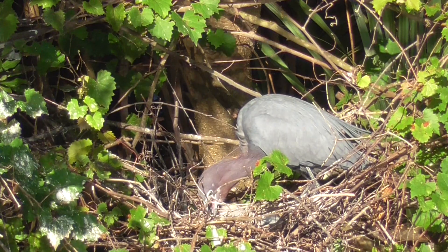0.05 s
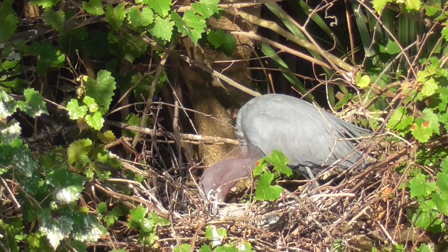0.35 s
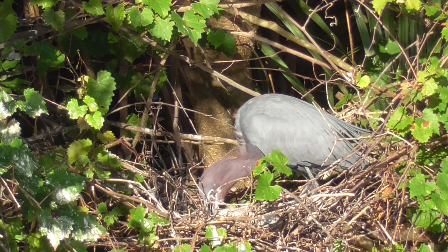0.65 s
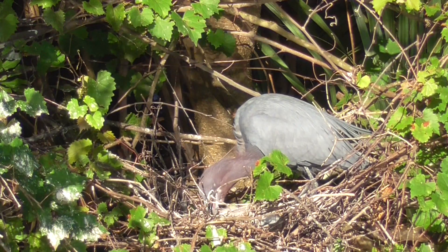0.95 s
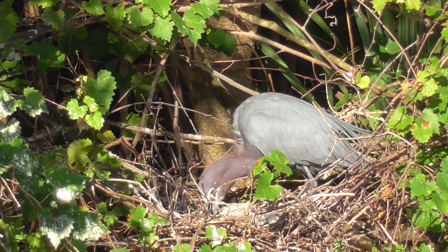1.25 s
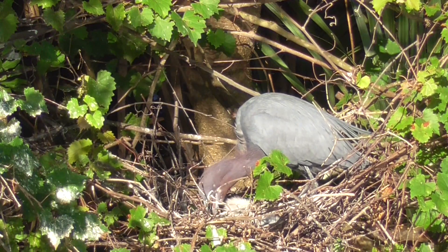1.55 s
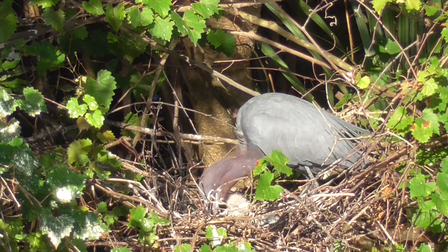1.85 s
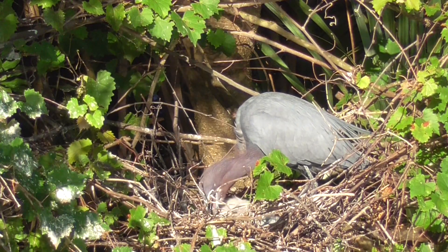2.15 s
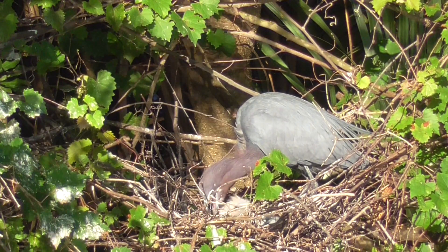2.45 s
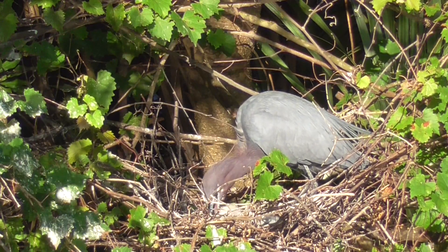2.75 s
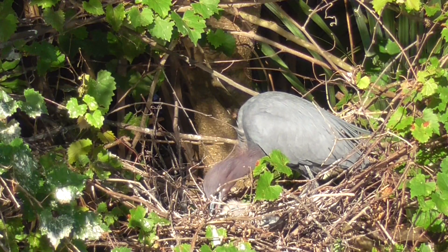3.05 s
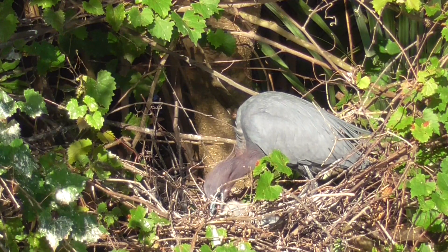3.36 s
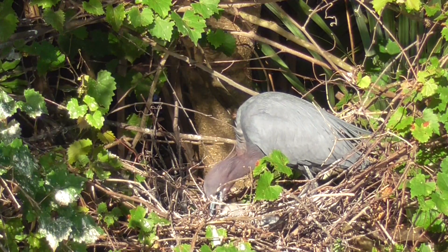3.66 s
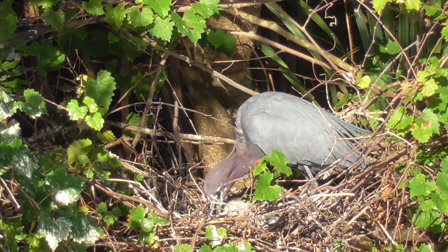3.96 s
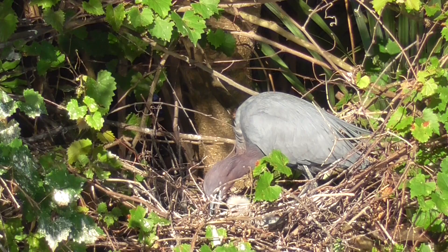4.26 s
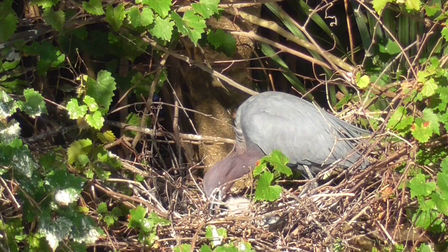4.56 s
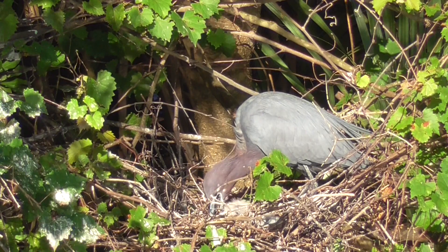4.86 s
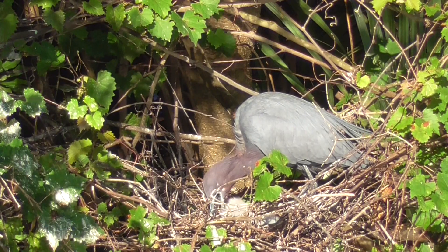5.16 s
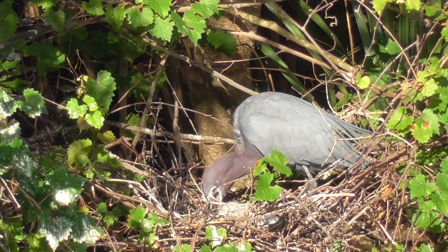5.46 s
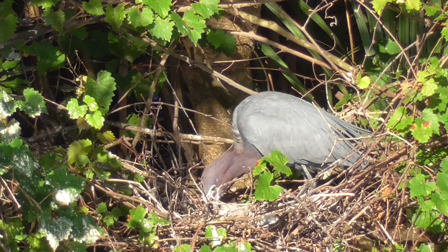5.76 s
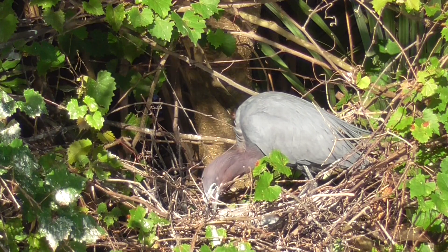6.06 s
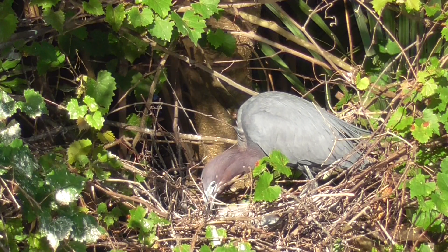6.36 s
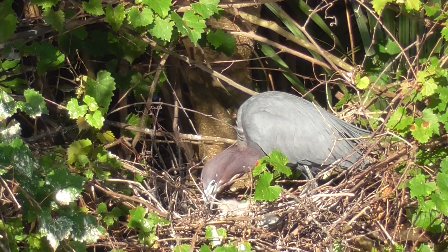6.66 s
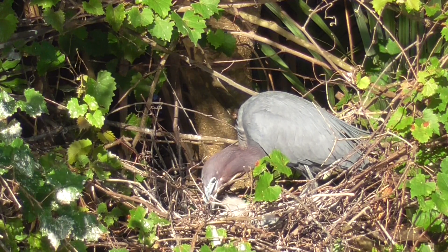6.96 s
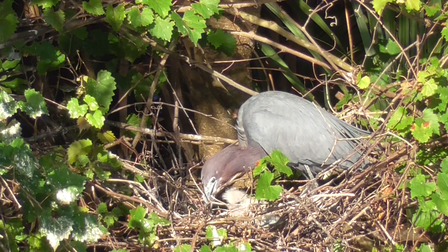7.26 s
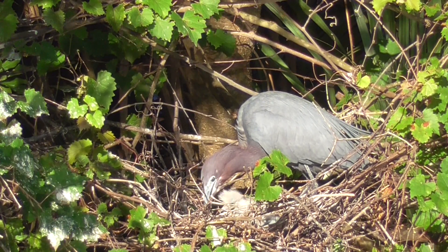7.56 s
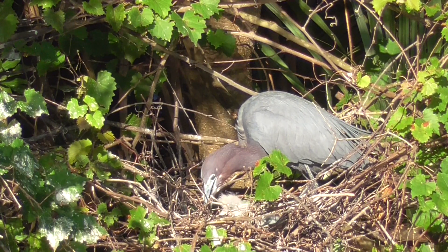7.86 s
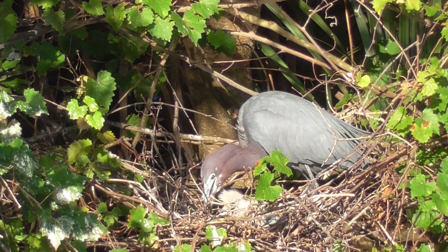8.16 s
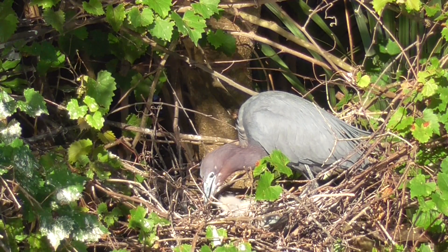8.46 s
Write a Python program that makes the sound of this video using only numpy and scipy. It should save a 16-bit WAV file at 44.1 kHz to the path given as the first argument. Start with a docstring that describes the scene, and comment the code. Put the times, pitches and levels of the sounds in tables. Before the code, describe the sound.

Heron nestlings beg with rapid, hoarse, high rasps and thin squeals over a faint distant traffic rumble.

```python
"""Heron nestlings beg with hoarse rasps, about five a second: fluttering air rings the throat over
a shaky whistle, and the open bill adds hiss. Thinner squeals, low clucks and a few gliding peeps come
in between, and the sticks of the nest knock as the birds shift. Leaves scatter these sounds. Farther
nests chatter, a faint insect starts near the end, and distant traffic and machines rumble underneath."""
import sys
import numpy as np
from scipy import signal
from scipy.fft import rfft, irfft, next_fast_len
from scipy.io import wavfile
from scipy.ndimage import map_coordinates

SR = 44100
rng = np.random.default_rng(int(sys.argv[2]) if len(sys.argv) > 2 else 0)


def unload_audio(sound):
    """Save the sound as a 16-bit wav file, at the path given as the first command line argument."""
    columns = np.transpose(np.atleast_2d(sound))
    # keep every value between -1 and 1, then stretch to whole-number steps
    steps = np.round(np.clip(columns, -1, 1) * 32767)
    wavfile.write(sys.argv[1], SR, steps.astype(np.int16))


N = 375732

# how alike traffic sounds in the two ears: f/Hz, likeness (1 = the same)
TRAFFIC_LIKENESS = [(60, 0.88), (130, 1), (290, 0.52), (640, 0.093), (1400, 0.096)]


def amp(db):
    """Turn decibels into a number to multiply by."""
    return 10 ** (np.asarray(db) / 20)


def unit(x):
    """Scale a sound to an average strength (rms) of 1."""
    return x / np.sqrt(np.mean(x ** 2) + 1e-20)


def along(points, hz):
    """Read between the rows of a (frequency, value) table, on a log frequency scale."""
    freqs, values = np.transpose(points)
    return np.interp(np.log(hz + 1), np.log(freqs + 1), values)


def clock(length):
    """The time of each sample over length seconds."""
    return np.arange(int(length * SR)) / SR


def wobble(rate, size):
    """A smooth curve through rate random values a second."""
    values = rng.standard_normal(int(size * rate / SR) + 4)
    return map_coordinates(values, [np.arange(size) * rate / SR])


def filtered(x, response):
    """Multiply each frequency in x by response(hz)."""
    size = x.shape[-1]
    padded = next_fast_len(size + 4096)
    hz = np.fft.rfftfreq(padded, 1 / SR)
    return irfft(rfft(x, padded) * response(hz), padded)[..., :size]


def coloured(x, spectrum):
    """Shape the tone of x by a (frequency, level) table, at strength 1."""
    return unit(filtered(x, lambda hz: amp(along(spectrum, hz))))


def resonance(x, centre_hz, width_hz):
    """Let x ring around one pitch: the same band filter twice, at strength 1."""
    band = lambda hz: 1j * hz * width_hz / (centre_hz ** 2 - hz * hz + 1j * hz * width_hz)
    return unit(filtered(x, lambda hz: band(hz) ** 2))


def spread(mid, side, likeness):
    """Mix two unrelated sounds into left and right; more side makes the ears less alike."""
    angle = lambda hz: np.arccos(np.clip(along(likeness, hz), 0, 1)) / 2
    mid = filtered(mid, lambda hz: np.cos(angle(hz)))
    side = filtered(side, lambda hz: np.sin(angle(hz)))
    return np.array([mid + side, mid - side])


def add(track, start, sound):
    """Mix a sound into the track at start seconds."""
    part = track[max(round(start * SR), 0):][:len(sound)]
    part += sound[:len(part)]


def swell(t, rise, length):
    """The loudness of one call: a quick rise and a slower fall."""
    rising = t / max(rise, .004)
    falling = (length - t) / max(length - rise, .01)
    return np.clip(np.minimum(rising, falling), 0, 1) ** 0.64


def flutter(size, rate, scatter, depth_db):
    """Uneven slaps make the loudness flicker; a depth of 0 leaves it steady."""
    slap_hz = rate * np.exp(scatter * wobble(rate, size))
    phase = 2 * np.pi * np.cumsum(slap_hz) / SR
    return unit(amp(depth_db * (np.cos(phase) + 0.46 * wobble(rate, size))))


def quaver(pitch_hz, rough, rate):
    """A tone of strength 1 whose pitch shakes at random."""
    hz = pitch_hz * (1 + rough * wobble(rate, len(pitch_hz)))
    return np.sqrt(2) * np.sin(2 * np.pi * np.cumsum(hz) / SR)


def squeaky_air(size, depth_db, width_hz, life_s):
    """Breath in a strained voice: noise in which narrow, ringing peaks come and go."""
    hz, t, spectra = signal.stft(rng.standard_normal(size), SR, nperseg=512)
    grid = rng.standard_normal((int(hz[-1] / width_hz) + 3, int(t[-1] / life_s) + 3))
    peaks = map_coordinates(grid, np.meshgrid(hz / width_hz, t / life_s, indexing="ij"))
    _, air = signal.istft(spectra * amp(depth_db * peaks), SR, nperseg=512)
    return unit(air[:size])


def foliage(x, t60):
    """Leaves and trunks return a blurred echo that falls by 60 dB in t60 seconds."""
    t = clock(.6)
    tail = rng.standard_normal(len(t)) * amp(-60 * t / t60) * (1 - np.exp(-t / 0.00043))
    return signal.fftconvolve(x, tail / np.linalg.norm(tail))[:N]


def traffic():
    """Distant traffic blends into a low, nearly steady rumble."""
    # tone of the rumble: f/Hz, level/dB
    spectrum = [(22, -33), (40, -20), (56, -10), (85, -5.5), (118, -1.5), (160, -4), (205, 0), (280, -7),
                (400, -11), (600, -14.5), (950, -16.5), (1450, -22), (1750, -30), (4000, -41.5)]
    mid, side = [coloured(rng.standard_normal(N), spectrum) for _ in range(2)]
    return unit(spread(mid, side, TRAFFIC_LIKENESS)) * amp(-56.5 + 0.24 * wobble(5, N))


def machines():
    """Distant machines hum on a few wavering tones."""
    # tones of the hum: f/Hz, level/dB, waver/dB
    tones = [(113, -68, 3), (202.6, -69, 2.6), (432.5, -76, 3), (541.7, -81, 2.5), (1063, -93, 1)]
    # slow rise and fall of the whole hum: t/s, gain/dB
    drift = [(0, 0), (1.6, 5.5), (2.6, 2), (4.05, 2), (4.6, -3), (8.5, 2.5)]
    hum = sum(amp(db + waver_db * wobble(4, N)) * quaver(np.full(N, hz), rough=0.01313, rate=11)
              for hz, db, waver_db in tones)
    return hum * amp(np.interp(np.arange(N) / SR, *np.transpose(drift)))


def background():
    """Traffic and machines sit toward the right, under a faint, even hiss."""
    # balance of rumble and hum: f/Hz, left minus right/dB
    balance = [(110, -5), (200, -5.5), (700, -4.5), (1300, -2.5), (2400, -3.5)]
    # tone of the hiss: f/Hz, level/dB
    hiss_spectrum = [(900, -50), (1900, -7.5), (2400, -3.5), (4800, 2.5), (6300, -14), (7400, -2),
                     (8300, 1), (9100, -4.5), (11000, -4), (13600, -8), (15700, -12.5)]
    left, right = traffic() + machines()
    left = filtered(left, lambda hz: amp(along(balance, hz) / 2))
    right = filtered(right, lambda hz: amp(-along(balance, hz) / 2))
    hiss = amp(-64.5) * coloured(rng.standard_normal((2, N)), hiss_spectrum)
    return np.array([left, right]) + hiss


def vehicles():
    """Far vehicles swell and fade on the left, each a broad band of roar."""
    # passing vehicles: t when nearest/s, half length/s, f/Hz, level/dB
    passes = [(.5, 1.3, 795, -68), (7.25, 1.07, 220, -62)]
    roar, t = np.zeros((2, N)), np.arange(N) / SR
    for nearest, half_length, hz, db in passes:
        closeness = 1 / (1 + ((t - nearest) / half_length) ** 2)
        roar += amp(db) * closeness * resonance(rng.standard_normal((2, N)), hz, width_hz=0.95 * hz)
    return spread(*roar, TRAFFIC_LIKENESS) * amp([[1.8], [-1.8]])


def insect(start=7.9, pitch_hz=9030, db=-78):
    """A far insect starts a thin, steady trill."""
    fade_in = np.clip((np.arange(N) / SR - start) / .1, 0, 1)
    return amp(db) * fade_in * resonance(rng.standard_normal(N), pitch_hz, width_hz=220)


def colony():
    """Farther nests blend into a squeaky chatter."""
    # tone of the chatter: f/Hz, level/dB
    spectrum = [(1700, -19), (2200, -8.5), (3100, -5.5), (3700, 11), (4200, 3.5), (5000, -2), (6000, -9.5),
                (7500, -10), (10000, -20), (15000, -33)]
    # its rise and fall: t/s, level/dB
    levels = [(0, -59.5), (1.5, -61), (1.68, -67), (1.9, -58.5), (3.4, -58), (3.54, -65), (3.8, -55.5),
              (5.3, -57.5), (8.5, -58)]
    chatter = coloured(squeaky_air(N, depth_db=5.5, width_hz=170, life_s=.045), spectrum)
    db = np.interp(np.arange(N) / SR, *np.transpose(levels)) + 0.97 * wobble(11, N)
    return amp(db) * chatter


def twig(start=6.37, db=-55, t60=0.11):
    """A dry twig crackles under the heaviest step."""
    out, t = np.zeros(N), clock(0.11)
    splinters = flutter(len(t), rate=300, scatter=0.66, depth_db=2) * rng.standard_normal(len(t))
    loudness = amp(db - 60 * t / t60) * (1 - np.exp(-t / .003))
    add(out, start, loudness * resonance(splinters, 12000, width_hz=4900))
    return out


def knocks(clack_t60=.05, thud_t60=0.071):
    """A stick clacks and the springy nest thuds under it."""
    # stick knocks: t/s, clack level/dB, thud level/dB
    hits = [(5.649, -53.5, -54), (5.892, -48, -54), (6.369, -53.5, -43), (6.39, -71, -44),
            (6.411, -74, -48.5), (6.431, -70, -44.5), (6.474, -72, -46.5), (6.757, -61, -46.5),
            (6.883, -65, -42.5), (7.8, -58, -60)]
    # tone of the stick: f/Hz, level/dB
    clack_spectrum = [(150, -23), (450, -4), (900, 1), (1350, -0.5), (1750, -12), (3000, -15), (9000, -39)]
    # tone of the nest: f/Hz, level/dB
    thud_spectrum = [(50, -36), (150, -6), (220, 0), (340, -4.5), (550, -17), (1500, -46), (5000, -80)]
    out, t = np.zeros(N), clock(.15)
    soft_start = 1 - np.exp(-t / 0.00064)
    for start, clack_db, thud_db in hits:
        clack, thud = rng.standard_normal((2, len(t)))
        add(out, start, amp(clack_db - 60 * t / clack_t60) * coloured(clack, clack_spectrum))
        add(out, start, amp(thud_db - 60 * t / thud_t60) * soft_start * coloured(thud, thud_spectrum))
    return out


def peeps():
    """Nearly clean notes glide along a shallow arch."""
    # peeps: t/s, length/s, start f/Hz, end f/Hz, level/dB
    calls = [(1.377, .035, 2650, 3120, -66), (1.436, .045, 3160, 2900, -61),
             (1.565, 0.082, 3720, 2900, -58.5), (1.724, .07, 3470, 3750, -57.5),
             (3.499, 0.086, 2810, 2730, -66.5), (3.727, 0.04, 3080, 2930, -63),
             (3.85, .06, 2780, 2860, -67), (6.08, 0.057, 3100, 3380, -57)]
    out = np.zeros(N)
    for start, length, start_hz, end_hz, db in calls:
        t = clock(length)
        span_hz = end_hz - start_hz
        arch_hz = 0.2 * abs(span_hz) * np.sin(np.pi * t / length)
        whistle = quaver(start_hz + span_hz * t / length + arch_hz, rough=0.02, rate=900)
        add(out, start, amp(db) * swell(t, 0.073 * length, length) * whistle)
    return out


def clucks():
    """Air rings the throat in lower notes between the cries."""
    # clucks: t/s, length/s, level/dB
    calls = [(0.166, 0.046, -70), (1.11, 0.11, -65), (1.32, 0.14, -60.5), (1.532, .08, -65),
             (5.056, .12, -69), (5.832, 0.058, -62), (7.156, 0.1, -68), (7.574, 0.104, -58.5),
             (7.684, 0.081, -63.5), (7.77, .07, -65), (7.897, 0.065, -61), (8.095, 0.07, -62)]
    out = np.zeros(N)
    for start, length, db in calls:
        t = clock(length)
        air = squeaky_air(len(t), depth_db=6.5, width_hz=156, life_s=0.023)
        add(out, start, amp(db) * swell(t, 0.18 * length, length) * resonance(air, 2780, width_hz=1900))
    return out


def squeal(length, pitch_hz):
    """One thin cry: mostly whistle, a little air, roughened by slapping membranes."""
    t = clock(length)
    bend = 1 + .03 * (np.sin(np.pi * t / length) - .7) + 0.0137 * wobble(79.4, len(t))
    whistle = quaver(pitch_hz * bend, rough=0.018, rate=900)
    breath = 0.68 * resonance(rng.standard_normal(len(t)), pitch_hz, width_hz=570)
    slaps = flutter(len(t), rate=220, scatter=0.325, depth_db=1.0)
    return swell(t, 0.14 * length, length) * unit((whistle + breath) * slaps)


def sibling():
    """A sibling cuts in with squeals of its own."""
    # squeals: t/s, length/s, f/Hz, level/dB
    calls = [(0.967, 0.085, 4280, -50), (1.06, 0.064, 4080, -52.5), (1.216, 0.083, 4270, -52),
             (1.424, .1, 4120, -53), (1.565, 0.047, 4410, -62), (1.728, .055, 4430, -64),
             (1.821, 0.071, 4000, -44), (2.282, 0.052, 4190, -45.5), (2.592, 0.063, 5110, -57),
             (2.74, .11, 4120, -50), (3.05, 0.053, 4000, -52.5), (3.215, .1, 4035, -50),
             (3.377, 0.079, 4020, -46), (4.27, 0.07, 4120, -49.5), (4.48, 0.095, 4290, -50.5),
             (4.647, 0.031, 4160, -50), (5.747, 0.085, 4200, -52), (6.832, 0.083, 5140, -56.5),
             (7.022, 0.1, 4990, -55), (7.225, .08, 4970, -57.5), (7.257, 0.11, 4060, -47)]
    out = np.zeros(N)
    for start, length, pitch_hz, db in calls:
        add(out, start, amp(db) * squeal(length, pitch_hz))
    return out


def push(t, length, db, attack_s=0.0075, crest_s=0.038, onset_db=-52.5):
    """The effort of one rasp, from 0 to 1: it snaps on, swells to a crest and ebbs."""
    onset = min(amp(onset_db - db), 1)
    snap = np.clip(t / attack_s, 0, 1)
    grow = np.clip(onset + (1 - onset) * t / crest_s, 0, 1)
    ebb = np.clip((length - t) / max(length - crest_s, .01), 0, 1) ** 0.81
    return snap * grow * ebb


def rasps(usual_hz=4020, throat_hz=4000, trail_hz=4054):
    """Air rings the throat over a shaky whistle, the open bill adds hiss, and a squeal trails off."""
    # begging rasps: t/s, length/s, level/dB, hoarseness/dB
    calls = [(0.044, 0.13, -48, -1), (.243, 0.21, -52, -1), (0.439, 0.2, -50.5, 1),
             (0.642, 0.16, -50.5, 1.5), (0.829, 0.067, -49.5, 0.5), (0.914, 0.17, -50, 2),
             (1.025, 0.13, -50, -0.5), (1.159, .17, -48.5, 0.5), (1.378, .15, -51, 3),
             (1.804, 0.14, -47, 2.5), (2.01, 0.13, -45, 0), (2.205, 0.22, -47.5, -0.5),
             (2.39, 0.21, -47.5, 0), (2.573, 0.22, -47.5, -1), (2.769, 0.13, -46.5, 1.5),
             (2.897, 0.17, -46.5, 1), (3.12, 0.22, -45.5, -1.5), (3.311, 0.21, -46.5, 0),
             (3.573, .16, -50.5, 0), (3.767, 0.18, -48.5, 0), (3.956, 0.15, -46, -1),
             (4.141, 0.23, -46, -2.5), (4.332, .14, -47, -1), (4.455, 0.15, -55, 3),
             (4.633, .13, -49.5, -1), (4.739, 0.14, -54.5, 3.5), (4.823, .16, -50.5, 1),
             (4.963, 0.11, -55.5, 1.5), (5.115, .14, -52, -1.5), (5.296, 0.14, -51, 0),
             (5.492, 0.13, -48, -2.5), (5.675, 0.14, -47.5, -0.5), (5.864, .15, -49.5, -1.5),
             (6.035, 0.17, -51, 2.5), (6.206, .16, -49.5, 1), (6.354, 0.23, -48.5, 1),
             (6.533, 0.12, -47, -1), (6.625, .11, -47, 1), (6.827, .12, -52, 2), (7.011, 0.12, -51, 1.5),
             (7.187, 0.18, -57.5, 5.5), (7.468, 0.092, -52.5, -5), (7.571, 0.13, -51.5, 6),
             (7.776, 0.13, -55, 7), (7.901, .11, -52.5, -4), (7.965, 0.12, -50, 2), (8.121, .12, -46, -2.5),
             (8.302, .14, -43.5, -2), (8.465, .17, -45, -4)]
    # tone of the throat when its pitch is throat_hz: f/Hz, level/dB
    throat_spectrum = [(2500, -67), (3100, -25), (3450, -7.5), (3750, -2), (4250, -2), (4600, -10.5),
                       (5200, -15.5), (6000, -45.5)]
    # strength of a second, higher throat ring: t/s, level against the bill's hiss/dB
    ring_levels = [(2, -26), (4.5, -0.5), (6.5, -1), (8.5, -4)]
    # tone of the bill's hiss: f/Hz, level/dB
    hiss_spectrum = [(3000, -42), (4200, -13), (5150, -2), (5800, 0), (6400, -0.5), (7250, 5.5),
                     (7900, 0.5), (8900, -5.5), (11200, -7.5), (13000, -17), (16000, -53)]
    # tone of the chest: f/Hz, level/dB
    chest_spectrum = [(1500, -66), (2000, 0.5), (2450, -2.5), (2850, 4), (3400, 10.5), (4500, -14),
                      (7000, -42)]
    out = np.zeros(N)
    for start, length, db, hoarse_db in calls:
        t = clock(length)
        effort = push(t, length, db)
        pitch_hz = usual_hz * (1 + 0.01198 * rng.standard_normal())
        throat_air, chest_air, bill_air = [
            squeaky_air(len(t), depth_db=3.5, width_hz=220, life_s=.03) for _ in range(3)]
        arch = 1.015 + 0.0812 * (np.sin(np.pi * t / length) - .7)  # the pitch lifts in mid-call
        waver = 1 + 0.0257 * wobble(70.06, len(t))
        whistle = quaver(pitch_hz * arch * waver, rough=0.018, rate=820)
        whistle *= 0.35 + t / length  # the cry starts hoarse and clears as it goes
        tuned_throat = [(hz * pitch_hz / throat_hz, level) for hz, level in throat_spectrum]
        voice = unit(coloured(throat_air, tuned_throat) + whistle)
        ring_db = np.interp(start, *np.transpose(ring_levels))
        ring = amp(ring_db) * resonance(chest_air, 4870, width_hz=1100)
        hiss = coloured(bill_air, hiss_spectrum) + ring
        hiss *= amp(0.95 * wobble(72.6, len(t)))  # the airflow catches
        hiss *= amp(-10.5 + hoarse_db) * effort ** 0.2  # the bill opens with effort
        # hoarseness lifts the chest faster than the hiss
        chest = amp(-19.5 + 1.65 * hoarse_db) * coloured(chest_air, chest_spectrum)
        add(out, start, amp(db) * effort * (voice + hiss + chest))
        trail = squeal(length=0.0905, pitch_hz=trail_hz * pitch_hz / usual_hz)
        add(out, start + .62 * length, amp(db - 8.5) * trail)
    return out


def scene():
    """The calls come from straight ahead, the knocks a little to the right, echoes from all round."""
    # how alike the calls sound in the two ears: f/Hz, likeness (1 = the same)
    call_likeness = [(2000, 1), (4000, 0.96), (7000, 0.85), (11000, 0.36)]
    ahead = rasps() + sibling() + clucks() + peeps() + twig() + colony() + insect()
    mid = ahead + amp(-8.5) * foliage(ahead, t60=0.29)
    calls = spread(mid, foliage(ahead, t60=0.12), call_likeness)
    sticks = knocks()
    stick_echoes = amp(-14) * np.array([foliage(sticks, t60=0.39) for _ in range(2)])
    return calls + sticks * amp([[-1.5], [1.5]]) + stick_echoes + background() + vehicles()


def record(dry, top_hz=15750):
    """Cut off the very highest treble."""
    return filtered(dry, lambda hz: hz < top_hz)


dry = scene()
out = record(dry)
unload_audio(out)
```